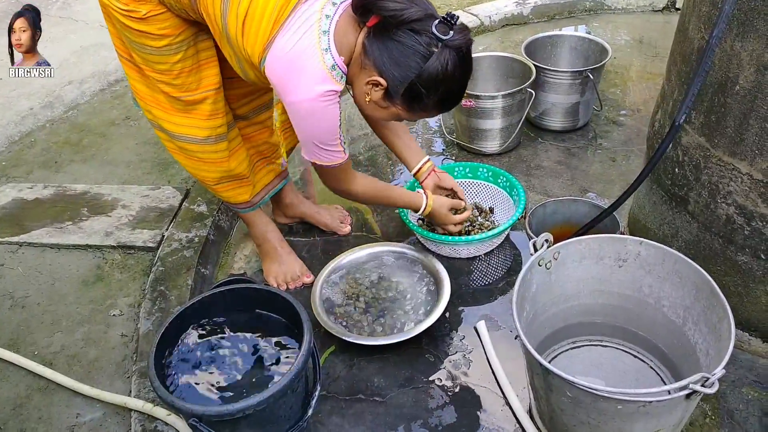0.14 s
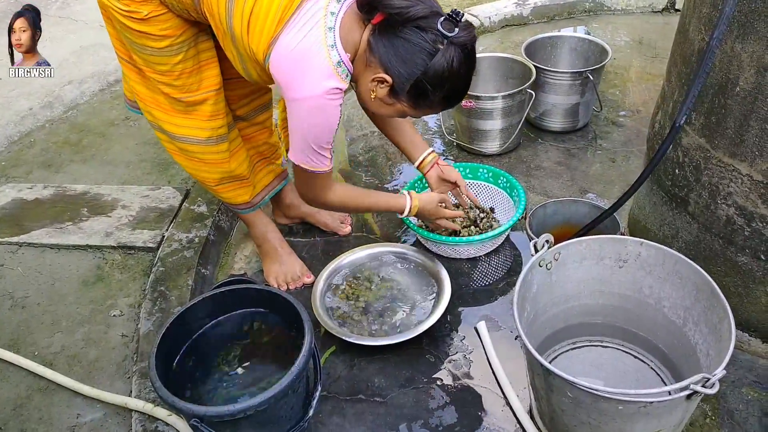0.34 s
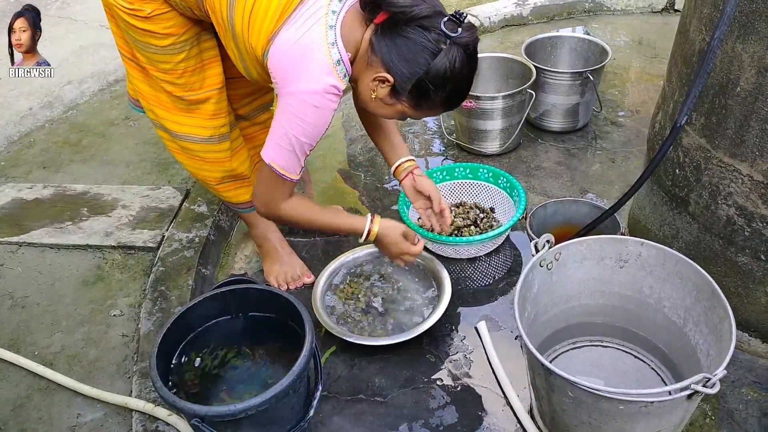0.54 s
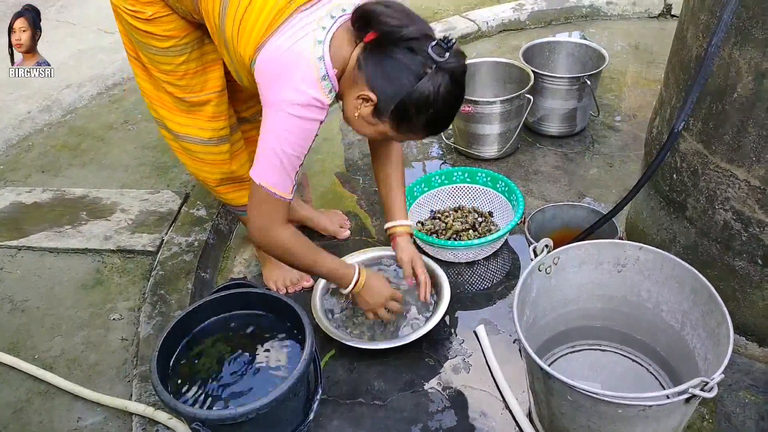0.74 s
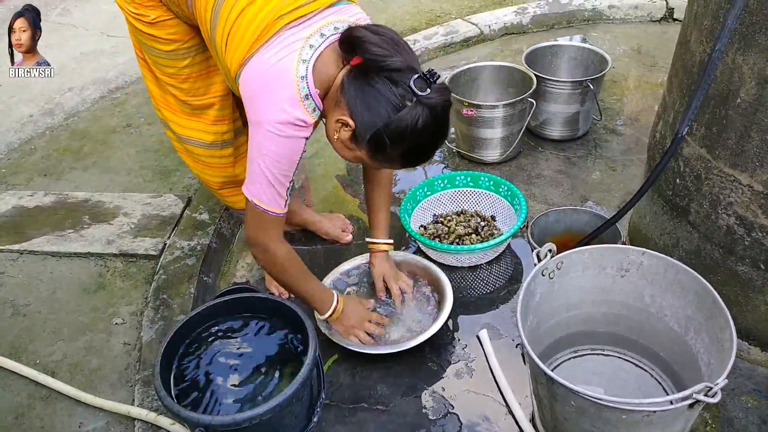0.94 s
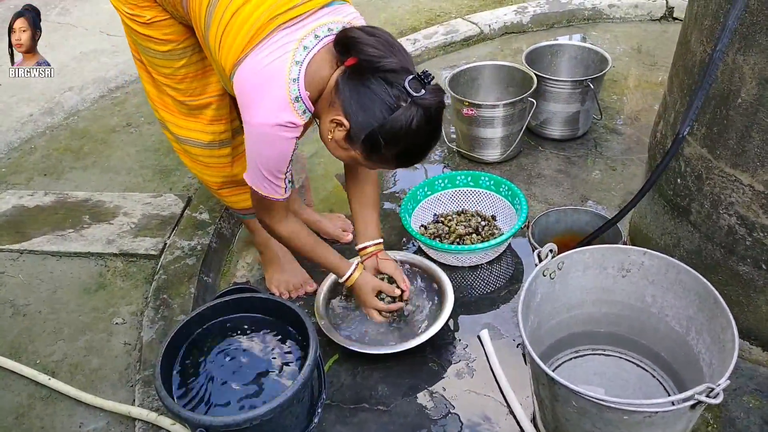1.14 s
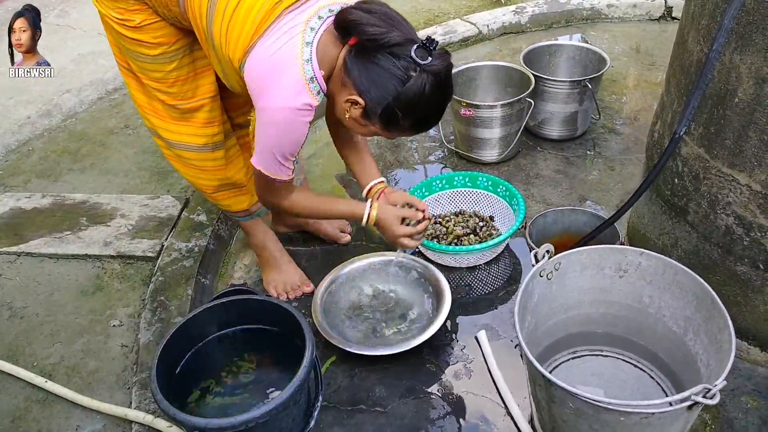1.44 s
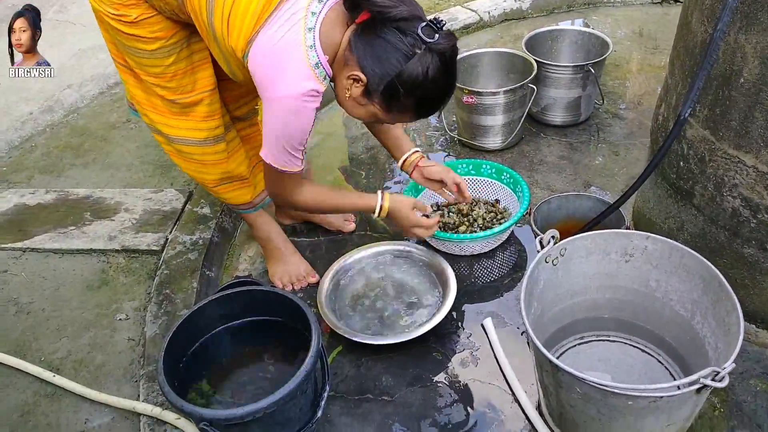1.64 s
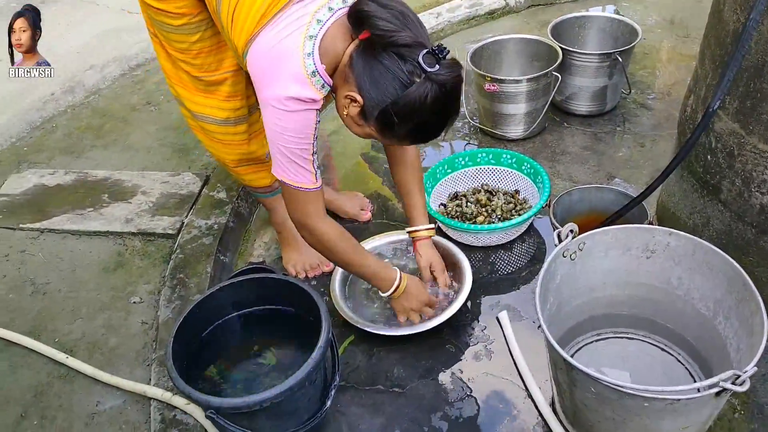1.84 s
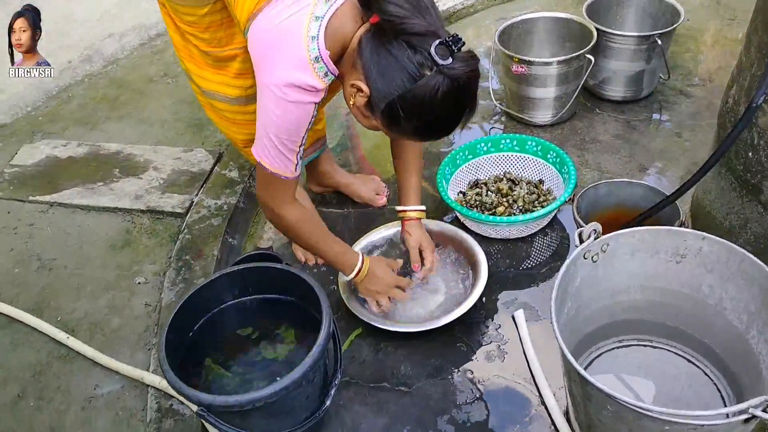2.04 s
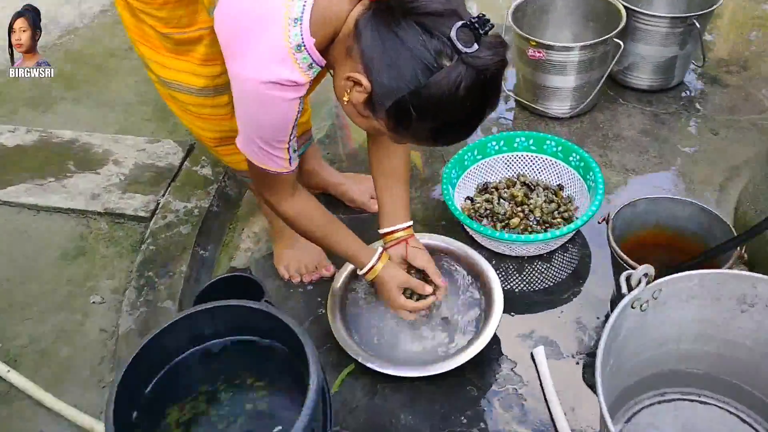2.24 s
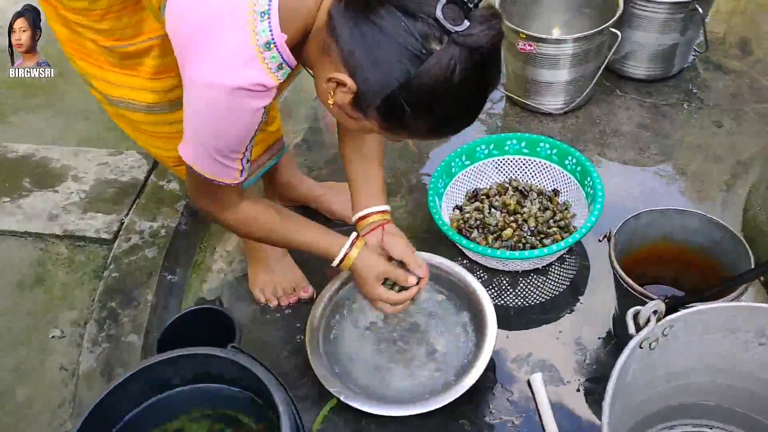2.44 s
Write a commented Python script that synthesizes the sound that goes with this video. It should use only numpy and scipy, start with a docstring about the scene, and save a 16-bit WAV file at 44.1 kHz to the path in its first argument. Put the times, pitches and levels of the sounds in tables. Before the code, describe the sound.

Wet snail shells clatter in bursts as they are washed by hand in water.

```python
"""Wet snail shells clatter in bursts as they are washed by hand in a paved yard.
Twice a handful is tipped on the heap in a plastic basket, and twice hands rake the shells
together in a steel bowl of water. Each contact is a sharp tick and a hollow knock;
basket and bowl ring under them. The water sloshes, and trapped air plops and gurgles."""
import sys
import numpy as np
from scipy import signal
from scipy.fft import rfft, irfft
from scipy.io import wavfile
from scipy.ndimage import uniform_filter1d

SR = 44100
rng = np.random.default_rng(int(sys.argv[2]) if len(sys.argv) > 2 else 0)


def inscribe(sig):
    """Save sig as 16-bit PCM at rate SR to the path in sys.argv[1].

    A 1-D sig is mono; a 2-D sig holds one channel per row.
    Samples are clipped to [-1, 1] before scaling.
    """
    pcm = np.round(np.clip(np.atleast_2d(sig).T, -1, 1) * 32767)
    wavfile.write(sys.argv[1], SR, pcm.astype(np.int16))


N = 114660
TIME = np.arange(N) / SR
TICK_T60_S, KNOCK_T60_S, THUD_T60_S = 0.015, 0.024, 0.013
CLATTER_RISE_S, CLACK_RISE_S = 0.0006, 0.002
BUBBLE_GLIDE_PER_S, BUBBLE_RISE_S = 5.4, 0.00053
STRIKE_GAIN = np.sqrt(0.005 * SR)  # unit energy to the energy of 5 ms at unit power


def amp(db):
    """Decibels to gain."""
    return 10 ** (np.asarray(db) / 20)


def at_hz(points, hz):
    """Interpolates a table on a log-frequency axis."""
    point_hz, value = np.transpose(points)
    return np.interp(np.log(hz + 1), np.log(point_hz), value)


def envelope(rows, column=1):
    """Gain over time from a dB column, silent outside the rows."""
    rows = np.array(rows)
    active = (TIME >= rows[0, 0]) & (TIME <= rows[-1, 0])
    return amp(np.interp(TIME, rows[:, 0], rows[:, column])) * active


def add(mix, start_s, sound):
    """Mixes in a stereo sound."""
    part = mix[:, round(start_s * SR):][:, :sound.shape[1]]
    part += sound[:, :part.shape[1]]


def convolve(x, response):
    """Plays x through a response."""
    return signal.fftconvolve(np.atleast_2d(x), response, axes=1)[:, :N]


def colour(x, spectrum, size=4096):
    """Minimum-phase filter with the given spectrum."""
    log_gain = np.log(amp(at_hz(spectrum, abs(np.fft.fftfreq(size, 1 / SR)))))
    taps = np.fft.ifft(np.exp(np.conj(signal.hilbert(log_gain)))).real
    return convolve(x, taps[None, :size // 2])[:, :x.shape[1]]


def unit(x):
    """Scales to a mean energy of one per channel."""
    return x / np.sqrt(np.sum(x ** 2) / 2 + 1e-20)


def decay(t, t60_s):
    """Exponential fall, 60 dB in t60_s."""
    return np.exp(-np.log(1000) * t / t60_s)


# Left-right likeness: freq_hz, correlation
COHERENCE = [(700, 0.76), (1300, 0.36), (2400, 0.62), (3300, 0), (6000, 0), (9000, -0.04), (15000, -0.1)]
def stereo_noise(size):
    """White noise, partly shared by the two channels."""
    left, other = rfft(rng.standard_normal((2, size)))
    shared = at_hz(COHERENCE, np.fft.rfftfreq(size, 1 / SR))
    return irfft([left, shared * left + np.sqrt(1 - shared ** 2) * other], size)


def impulses(rows):
    """One push per row of start_s, level_db."""
    out = np.zeros(N)
    for start_s, level_db in rows:
        out[round(start_s * SR)] = amp(level_db)
    return out


def collisions(rate_per_s, spread_db=2, smooth_s=0.022):
    """Random impacts of uneven size and steady mean power."""
    strength = amp(spread_db * np.minimum(rng.exponential(1, N), 4)) * rng.choice([-1, 1], N)
    hits = strength * (rng.random(N) < rate_per_s / SR)
    width = int(smooth_s * SR)
    power = uniform_filter1d(uniform_filter1d(hits ** 2, width), width)
    return hits / np.sqrt(abs(power) + 1e-6)


def contact(spectrum, t60_s, rise_s, size=2048):
    """One contact: a quick swell and a short, dense ring, new each time."""
    t = np.arange(size) / SR
    burst = stereo_noise(size) * np.minimum(t / rise_s, 1) * decay(t, t60_s)
    return unit(colour(burst, spectrum))


def clatter(hits, spectrum, t60_s, count=16):
    """Shares the impacts among bodies that each ring their own way."""
    body = rng.integers(0, count, N)
    return sum(convolve(hits * (body == k), contact(spectrum, t60_s, CLATTER_RISE_S))
               for k in range(count))


def ring(hits, modes, size=8192):
    """Impacts excite a body's damped modes."""
    t = np.arange(size) / SR
    body = sum(amp(db) * decay(t, t60_s) * np.sin(2 * np.pi * hz * t + rng.normal(0, 0.91, (2, 1)))
               for hz, db, t60_s in modes)
    return convolve(hits, unit(body))


# Outdoor noise spectra: freq_hz, density_db
HUSH_SPECTRUM = [(25, -19), (190, -17.5), (400, -22), (2200, -25.5), (3600, -24), (4500, -30.5),
                 (8000, -32.5), (15000, -59)]
RUMBLE_SPECTRUM = [(25, -1), (55, 3), (90, -7), (150, -17), (400, -35)]
# Rumble swell: time_s, level_db
RUMBLE_LEVELS = [(0, -51), (.82, -47.5), (.87, -42), (1.2, -45), (1.45, -41.5), (1.7, -45.5), (2.6, -49.5)]
def air(hush_db=-49.5):
    """Steady outdoor hush over a wavering rumble."""
    hush = unit(colour(stereo_noise(N), HUSH_SPECTRUM))
    rumble = unit(colour(stereo_noise(N), RUMBLE_SPECTRUM))
    return np.sqrt(N) * (amp(hush_db) * hush + envelope(RUMBLE_LEVELS) * rumble)


def yard(x, level_db=-13, t60_s=0.071, rise_s=0.009, size=12000):
    """Adds faint, quick reflections from paving, wall and buckets."""
    t = np.arange(size) / SR
    reflections = stereo_noise(size) * decay(t, t60_s) * np.minimum(t / rise_s, 1)
    return x + amp(level_db) * convolve(x, unit(reflections))


def bubble(pitch_hz, t60_s, phase_rad, size):
    """Trapped air rings briefly and rises in pitch."""
    t = np.arange(size) / SR
    tone = np.sin(2 * np.pi * pitch_hz * (t + BUBBLE_GLIDE_PER_S * t ** 2 / 2) + phase_rad)
    return tone * np.minimum(t / BUBBLE_RISE_S, 1) * decay(t, t60_s)


def gurgles(stirring, rate_per_s=220, range_hz=(1500, 2605), t60_cycles=25, gain_db=-11, count=24):
    """Small bubbles of many sizes, louder with harder stirring."""
    out = np.zeros((2, N))
    hits = collisions(rate_per_s) * stirring
    size_class = rng.integers(0, count, N)
    for k, pitch_hz in enumerate(np.linspace(*range_hz, count)):
        phase_rad = rng.normal(0, 0.68, (2, 1))
        tone = bubble(pitch_hz, t60_cycles / pitch_hz, phase_rad, size=2048)
        out += convolve(hits * (size_class == k), unit(tone))
    return amp(gain_db) * out


# Air pockets: start_s, pitch_hz, level_db, t60_s
PLOPS = [(0.099, 335, -46, .04), (.753, 1980, -27.5, 0.022), (0.827, 1500, -20.5, 0.0059),
         (.831, 464, -30.5, 0.033), (0.838, 1320, -31, 0.022), (1.293, 950, -23.5, 0.055),
         (1.426, 8500, -23, 0.014), (2.241, 2280, -7.5, 0.031), (2.312, 1330, -11, 0.028),
         (2.382, 203, -25.5, 0.047), (2.389, 1145, -24, 0.023), (2.53, 1460, -6, 0.013),
         (2.532, 1000, -22.5, 0.022), (2.529, 226, -21.5, 0.011)]
def plops():
    """Single air pockets ring in the water, alike in both channels."""
    out = np.zeros((2, N))
    for start_s, pitch_hz, level_db, t60_s in PLOPS:
        add(out, start_s, amp(level_db) * bubble(pitch_hz, t60_s, np.zeros((2, 1)), size=4096))
    return out


# Raking levels, one list per stroke: time_s, tick_db, knock_db, slosh_db
RAKES = [
    [(.85, -57, -52, -75), (.918, -51.5, -46, -71), (.946, -34, -36, -41.5), (1.038, -31.5, -31.5, -45.5),
     (1.12, -19, -20.5, -36), (1.165, -20.5, -23, -34), (1.23, -22.5, -23, -40.5),
     (1.312, -27, -28.5, -41.5), (1.326, -16.5, -22, -34), (1.355, -32, -36, -43),
     (1.385, -32, -32.5, -43.5), (1.47, -34.5, -33, -43), (1.53, -45.5, -44, -48), (1.55, -32.5, -37, -49),
     (1.59, -76, -65, -51)],
    [(1.83, -53, -56, -78), (1.928, -56, -51, -54), (1.948, -42, -39, -46.5), (2.03, -37, -36.5, -49),
     (2.115, -45.5, -43.5, -51.5), (2.18, -35.5, -33, -50.5), (2.228, -21, -25.5, -42),
     (2.242, -12, -17, -38), (2.258, -21, -20.5, -38), (2.28, -18.5, -19, -35.5), (2.324, -21, -20.5, -46),
     (2.356, -30.5, -32, -40.5), (2.435, -29.5, -32, -37.5), (2.47, -41.5, -36.5, -50.5),
     (2.525, -32, -35, -34.5), (2.6, -49, -45, -52)],
]
# Shell and water spectra: freq_hz, density_db
SHELL_TICK = [(2500, -25.5), (3650, -15.5), (4500, -3), (5900, 0.5), (7800, -6.5), (9000, -16.5),
              (11000, -20.5), (12200, -40), (15500, -30)]
SHELL_KNOCK = [(600, -30.5), (1100, -9.5), (1500, -8.5), (1850, -2), (2400, 3), (2720, 0), (3000, -10.5),
               (3500, -11.5), (6000, -31)]
SLOSH = [(150, -8), (380, -8.5), (700, -2.5), (1000, -0.5), (1350, 1.5), (1900, -25.5)]
# Steel bowl, damped by water and hands: pitch_hz, level_db, t60_s
BOWL_MODES = [(1880, -3, .07), (2180, -2, .07), (2370, 0, .08), (2560, -2, .07)]
def raking(rate_per_s=1900, clump_s=0.038, clump_db=1.8):
    """Shells grind in clumps on each other and the bowl; the water sloshes and gurgles."""
    tick_gain, knock_gain, slosh_gain = (sum(envelope(rake, k) for rake in RAKES) for k in (1, 2, 3))
    width = int(clump_s * SR)
    clumps = np.sqrt(width) * uniform_filter1d(rng.standard_normal(N), width)
    hits = collisions(rate_per_s) * amp(clump_db * clumps)
    splashes = collisions(rate_per_s / 2) * slosh_gain
    ticks = amp(-0.5) * clatter(hits * tick_gain, SHELL_TICK, TICK_T60_S)
    knocks = amp(1) * clatter(hits * knock_gain, SHELL_KNOCK, KNOCK_T60_S)
    bowl = amp(-7) * ring(hits * knock_gain, BOWL_MODES)
    water = amp(1) * clatter(splashes, SLOSH, t60_s=0.01)
    return ticks + knocks + bowl + water + gurgles(knock_gain)


# Tipping levels, one list per handful: time_s, tick_db, knock_db, basket_db
TIPS = [
    [(0, -49.5, -42.5, -52), (.09, -60, -54.5, -81), (.148, -55, -36.5, -52), (.195, -38, -28.5, -53),
     (.234, -31.5, -28, -54), (.25, -14, -14.5, -26), (.278, -15.5, -12.5, -20), (.345, -13, -10, -19.5),
     (.39, -22.5, -16, -26.5), (.434, -23.5, -23.5, -30.5), (.496, -41, -36.5, -48),
     (.545, -48.5, -37, -49), (.62, -62, -56, -75)],
    [(1.58, -53, -40, -52), (1.608, -41, -35, -54), (1.626, -25, -21, -33), (1.643, -15.5, -16, -24.5),
     (1.672, -13, -16, -29.5), (1.704, -26, -20, -29.5), (1.722, -23, -29, -42), (1.738, -42, -38.5, -45),
     (1.792, -45, -35, -75), (1.825, -87, -79, -83)],
]
# Landing spectra: freq_hz, density_db
TIP_TICK = [(3000, -49.5), (3850, -14), (4400, -4.5), (6100, 2), (7600, -2), (8800, -11), (10500, -14),
            (12000, -25.5), (13300, -18), (15500, -17.5)]
TIP_KNOCK = [(600, -37), (1100, -18), (1500, -6), (1900, 2), (2450, -1), (2800, -5.5), (3100, -8),
             (3700, -26.5)]
BASKET_THUD = [(40, -38), (200, -32), (480, -12), (630, -1.5), (780, 9.5), (1250, 9.5), (1800, 11.5),
               (3000, -34)]
HEAP_THUD = [(40, -50), (200, -14), (450, -22.5), (800, -6), (1050, -12), (1350, 3.5), (1800, 3),
             (3000, -34)]
# Loaded plastic basket: pitch_hz, level_db, t60_s
BASKET_MODES = [(943, 0, .17), (1007, 4.5, .19), (1268, -1, .15), (1360, -3, .15), (1709, -2, .18),
                (1836, -2, .18), (1958, -1, .2), (2035, -2, .2)]
def tipping(rate_per_s=1700, cushion_db=-11):
    """Shells rain on the heap; the first handful shakes the basket, the second is cushioned."""
    hits = collisions(rate_per_s)
    tick_gain, knock_gain = (sum(envelope(tip, k) for tip in TIPS) for k in (1, 2))
    first, second = (hits * envelope(tip, column=3) for tip in TIPS)
    ticks = amp(4) * clatter(hits * tick_gain, TIP_TICK, TICK_T60_S)
    knocks = amp(-2) * clatter(hits * knock_gain, TIP_KNOCK, KNOCK_T60_S)
    thuds = clatter(first, BASKET_THUD, THUD_T60_S, count=6)
    thuds += clatter(second, HEAP_THUD, THUD_T60_S, count=6)
    basket = amp(-11) * ring(first + amp(cushion_db) * second, BASKET_MODES)
    return ticks + knocks + amp(5) * thuds + basket


# Heavy landings: start_s, level_db
BLOWS = [(.238, -18.5), (0.27, -12)]
def basket_blows(ring_db=6):
    """Falling shells thud on the basket and set it ringing."""
    hits = impulses(BLOWS)
    thuds = convolve(hits, contact(BASKET_THUD, THUD_T60_S, CLATTER_RISE_S))
    return STRIKE_GAIN * (thuds + amp(ring_db) * ring(hits, BASKET_MODES))


# Drops and bounces: start_s, level_db
DROPS = [(.791, -30.5), (1.3615, -18.5), (1.364, -15.5)]
def shell_drops(modes_hz=(2810, 4600, 5620, 6450), t60_s=0.016, knock_db=-5):
    """A hard shell drops or bounces and rings at its own pitches."""
    hits = impulses(DROPS)
    tick = contact(SHELL_TICK, t60_s, CLACK_RISE_S)
    knock = amp(knock_db) * contact(SHELL_KNOCK, t60_s, CLACK_RISE_S)
    ringing = ring(hits, [(hz, 0, t60_s) for hz in modes_hz])
    return STRIKE_GAIN * (convolve(hits, tick + knock) + ringing)


# Hard shell contacts, relative levels: start_s, tick_db, knock_db
CLACKS = [(0.074, -39.5, -35), (0.187, -25, -32), (.225, -19, -41), (.238, -9.5, -15), (0.252, -11, -16),
          (0.267, -13, -5), (0.53, -49, -23), (.752, -31.5, -34), (0.778, -35, -35), (0.7882, -16, -31),
          (.802, -32, -40), (0.823, -35, -29.5), (1.005, -34, -21), (1.068, -23.5, -17), (1.114, -10, -23),
          (1.122, -25, -28), (1.153, -14, -12.5), (1.171, -12.5, -20), (1.269, -19, -13), (1.29, -18, -19),
          (1.319, -20, -15.5), (1.406, -21, -22), (1.456, -24.5, -20.5), (1.612, -24.5, -45),
          (1.637, -4, -25), (1.651, -5.5, -16), (1.667, -7, -6.5), (1.942, -29, -38), (2.051, -29.5, -30),
          (2.104, -31, -45), (2.138, -32, -28), (2.151, -25.5, -22), (2.206, -34, -17.5),
          (2.237, -13, -12.5), (2.279, -8.5, -22), (2.531, -24, -23)]
def clacks(gain_db=-4):
    """Single hard contacts stand out of the clatter, shell on shell or on the basket."""
    out = np.zeros((2, N))
    for start_s, tick_db, knock_db in CLACKS:
        tick = amp(tick_db) * contact(SHELL_TICK, t60_s=0.014, rise_s=CLACK_RISE_S)
        knock = amp(knock_db) * contact(SHELL_KNOCK, t60_s=0.014, rise_s=CLACK_RISE_S)
        add(out, start_s, tick + knock)
    return STRIKE_GAIN * amp(gain_db) * out


def scene():
    """Shells and water in the yard, over the outdoor air."""
    return yard(tipping() + raking() + clacks() + basket_blows() + shell_drops() + plops()) + air()


# Microphone balance: freq_hz, left_minus_right_db
BALANCE = [(60, -1), (1000, 1), (2400, 1.5), (3700, 1.5), (4900, 2), (6100, 9.5), (7000, -1.5),
           (8000, -6.5), (9300, -7.5), (11500, 4.5), (13300, -3), (15500, 10)]
def record(dry, dip_s=(0.81, 0.823), dip_db=-24, ceiling=0.9, cutoff_hz=15600):
    """Each microphone has its own colour; the level dips briefly; soft clip, then low-pass."""
    balance_db = at_hz(BALANCE, np.fft.rfftfreq(N, 1 / SR))
    x = irfft(rfft(dry) * amp([balance_db / 2, -balance_db / 2]), N)
    in_dip = (TIME > dip_s[0]) & (TIME < dip_s[1])
    x = x * amp(dip_db * uniform_filter1d(in_dip.astype(float), size=40))
    x = x / (1 + (x / ceiling) ** 10) ** (1 / 10)
    lowpass = signal.firwin(511, cutoff_hz, window=("kaiser", 8), fs=SR)
    return signal.oaconvolve(x, lowpass[None], "same")


dry = scene()
out = record(dry)
inscribe(out)
```